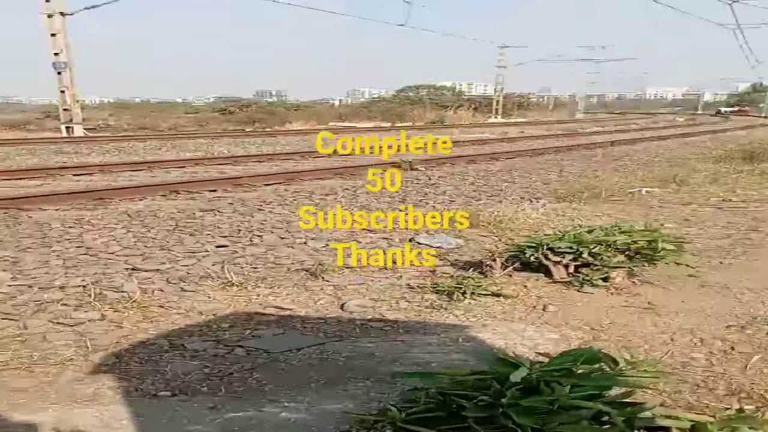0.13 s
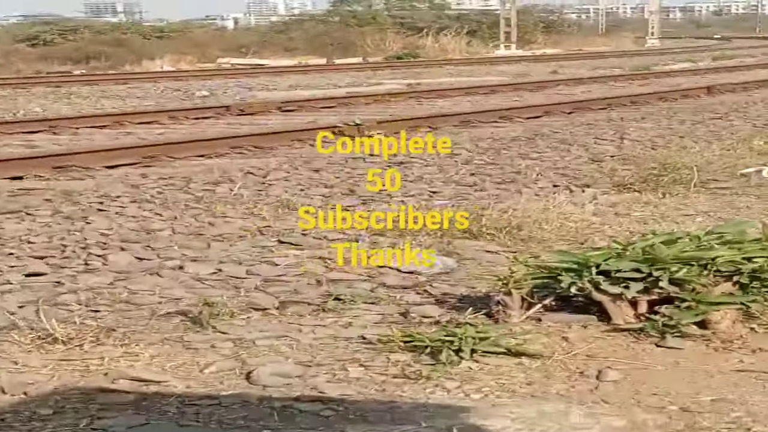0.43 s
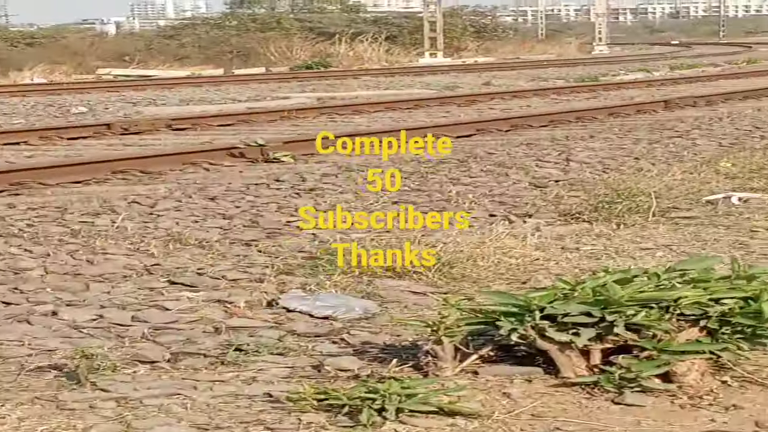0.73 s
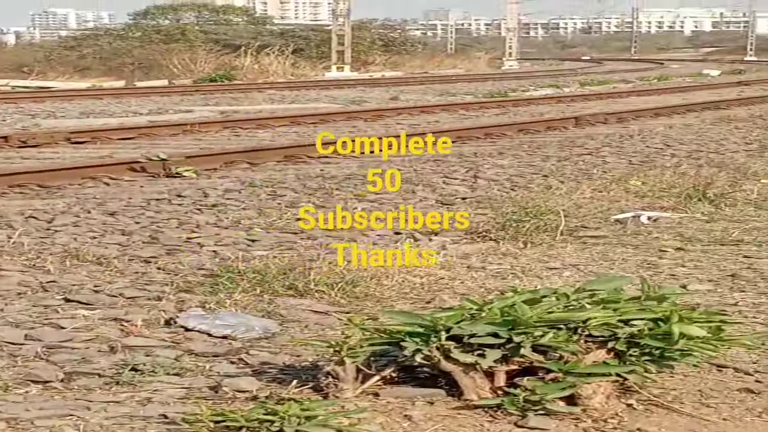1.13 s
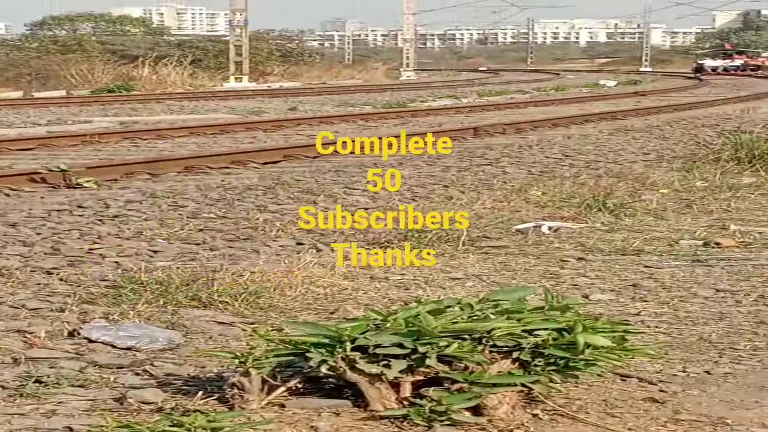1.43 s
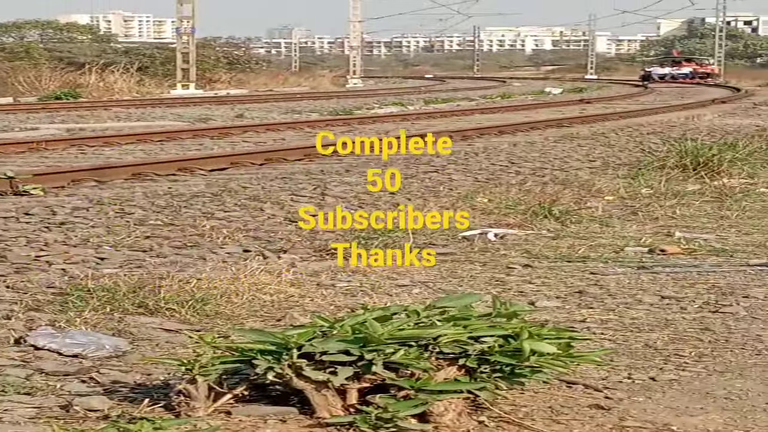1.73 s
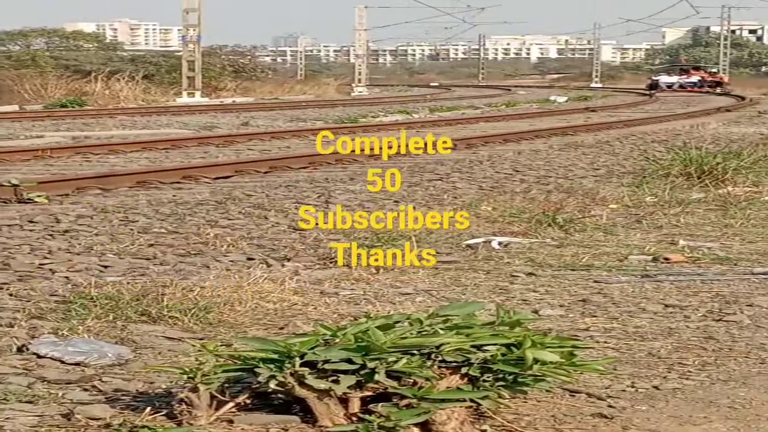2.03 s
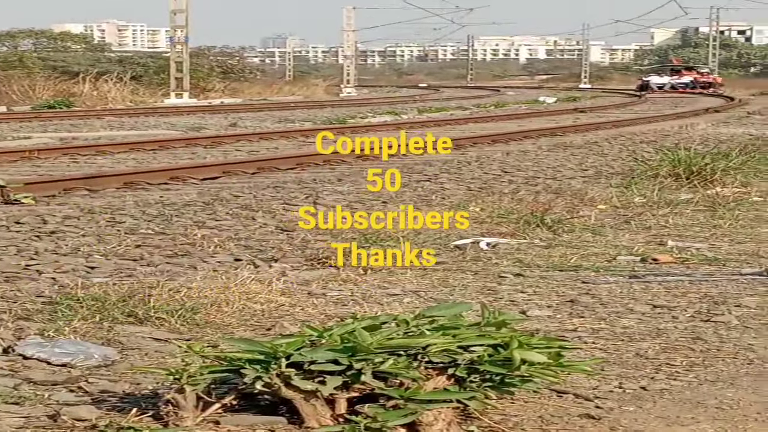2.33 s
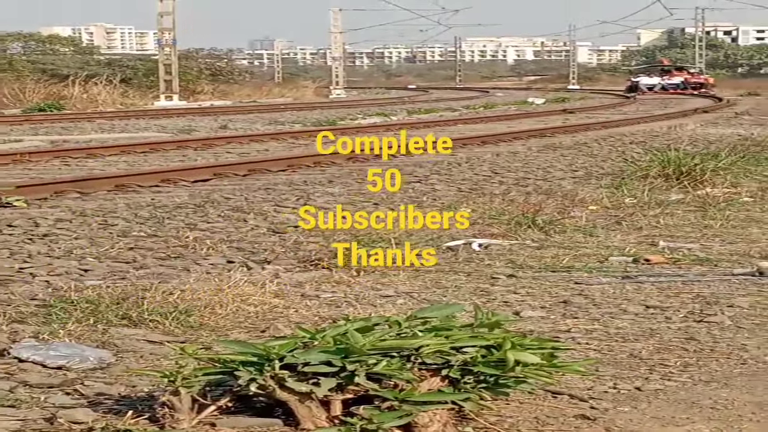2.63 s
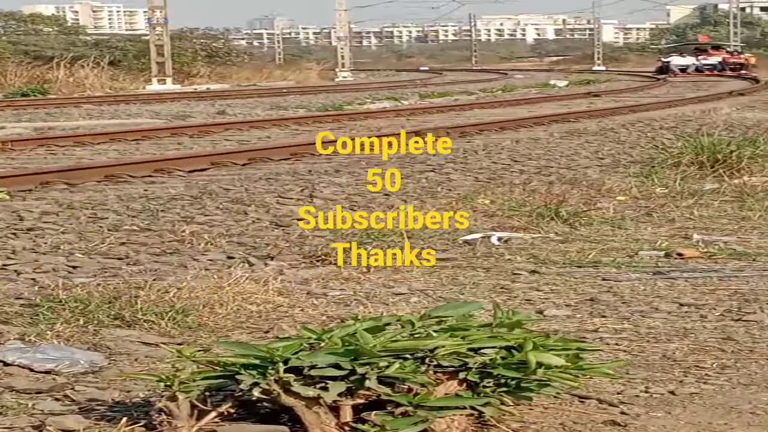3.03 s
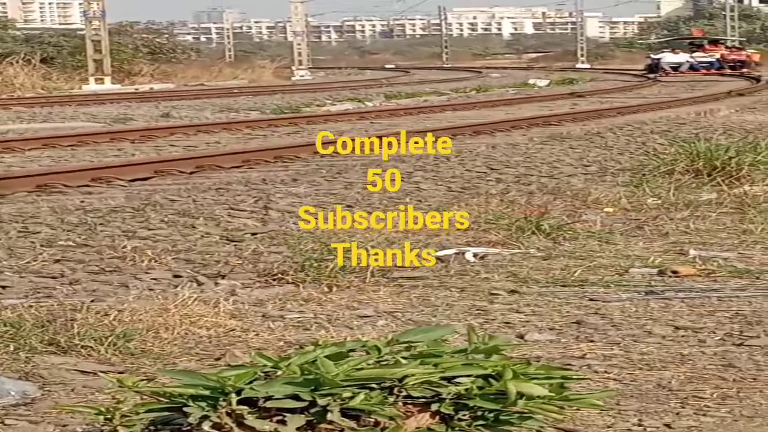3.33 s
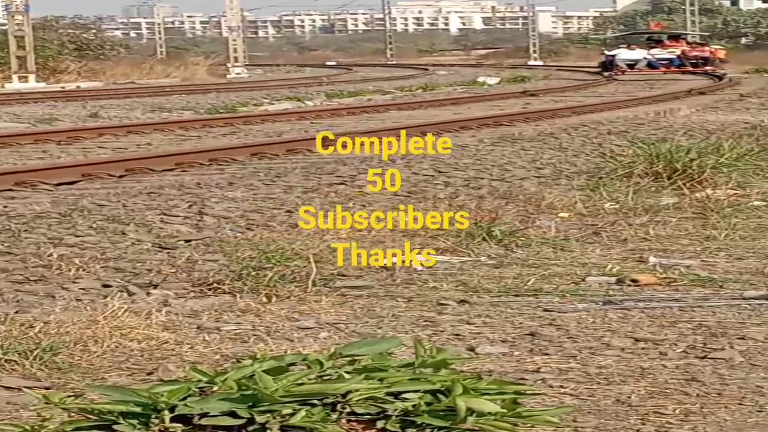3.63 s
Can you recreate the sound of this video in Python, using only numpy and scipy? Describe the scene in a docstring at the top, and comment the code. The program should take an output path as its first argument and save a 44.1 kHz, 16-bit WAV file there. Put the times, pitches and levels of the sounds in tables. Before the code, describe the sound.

A small motor trolley on rails approaches across an open yard, its engine knocking about ten times a second over clatter and hiss; wind thumps the phone microphone midway, and the rolling roar grows.

```python
"""A small motor trolley on rails nears across an open yard: from the start its single-cylinder engine knocks
about ten times a second, each contact ringing the casing, over clatter and hiss (shaped noise) and a low hum (sines).
Wind thumps on the ports of a phone (damped low rings) come now and then throughout, strongest near 1.6 to 2.1 s;
between about 0.95 and 1.35 s there are faint gliding squeaks and two dry ticks (shaped clicks). The rolling roar
(noise and wandering drones) swells later. The phone has a narrow dip near 520 Hz and a step down above 1400 Hz."""
import sys
import numpy as np
from scipy import signal
from scipy.fft import rfft, irfft
from scipy.io import wavfile

SR = 44100
rng = np.random.default_rng(int(sys.argv[2]) if len(sys.argv) > 2 else 0)


def digitize_waveform(pressure):
    """Quantize a signal to 16-bit integers and store it at the path in sys.argv[1].

    Rows of a 2-D input are taken as channels; values are limited to [-1, 1].
    """
    field = np.atleast_2d(pressure).T
    bounded = np.clip(field, -1, 1)
    quanta = np.round(bounded * 32767).astype(np.int16)
    wavfile.write(sys.argv[1], SR, quanta)


def volts_from_db(level):
    """Convert decibel levels to linear amplitude ratios."""
    exponent = np.asarray(level, float) / 20
    return 10 ** exponent


N = 166257
TIME_S = np.arange(N) / SR
SIZE = 2 ** 18   # transform length, samples
HZ = np.maximum(np.arange(SIZE // 2 + 1) * SR / SIZE, 1)
TREBLE_BOOST_DB = 24   # offsets the phone's step down for sources above it
SHARED_ONLY = np.array([[1], [0]])   # row 0 reaches both ports alike, row 1 does not


def rms_one(x):
    """Normalisation: scale to unit rms."""
    return x / np.sqrt(np.mean(x ** 2) + 1e-20)


def in_time(rows):
    """Linear interpolation: table columns as curves over time."""
    s, *columns = np.transpose(rows)
    return [np.interp(TIME_S, s, column) for column in columns]


def on_hz(rows):
    """Interpolation on a logarithmic frequency axis; a lone column falls to -90 dB outside its range."""
    hz, *columns = np.transpose(rows)
    outside = [-90, -90] if len(columns) == 1 else []
    return [np.interp(np.log(HZ), np.log(hz), column, *outside) for column in columns]


def colour(x, spectrum):
    """Minimum-phase filtering: folding the cepstrum forward makes the given response causal."""
    cepstrum = irfft(on_hz(spectrum)[0] * np.log(10) / 20)
    cepstrum[1:SIZE // 2] *= 2
    cepstrum[SIZE // 2 + 1:] = 0
    response = np.exp(rfft(cepstrum))
    return irfft(rfft(x, SIZE) * response)[..., :N]


def drift(rate_hz):
    """Low-pass random process: noise through two equal poles, of unit rms."""
    stride = 40   # samples between computed points
    settle = 2000
    r = np.exp(-2 * np.pi * rate_hz * stride / SR)
    white = rng.standard_normal(N // stride + settle + 2)
    slow = signal.lfilter([1], [1, -2 * r, r * r], white)[settle:]
    return np.interp(np.arange(N) / stride, np.arange(len(slow)), rms_one(slow))


def ring(clicks, hz, t60_s):
    """Damped resonator: a unit click excites an exponentially decaying sine of initial height 1."""
    r = volts_from_db(-60 / (t60_s * SR))
    w = 2 * np.pi * hz / SR
    return signal.lfilter([0, np.sin(w)], [1, -2 * r * np.cos(w), r * r], clicks + 1e-18)


def clicks_at(s, gain):
    """Impulse excitation: one-sample clicks at the given times."""
    out = np.zeros(N)
    inside = (s >= 0) & (s < (N - 1) / SR)
    np.add.at(out, (s[inside] * SR).astype(int), gain[inside])
    return out


def coloured_pair(spectrum):
    """Spectral shaping: two uncorrelated coloured noises, scaled to unit rms."""
    return rms_one(colour(rng.standard_normal((2, N)), spectrum))


def noise(spectrum, level, flicker_db, rate_hz):
    """Amplitude modulation: coloured noises under one flickering level curve."""
    return coloured_pair(spectrum) * volts_from_db(in_time(level)[0] + flicker_db * drift(rate_hz))


def resonances(rows, level):
    """Narrow-band resonance: noise keeps each mode ringing, swelling and fading on its own."""
    out = 0
    for hz, width_hz, db in rows:
        t60_s = np.log(1000) / (np.pi * width_hz)
        mode = ring(rng.standard_normal((2, N)), hz, t60_s)
        flicker_db = 2.2 * drift(5.0)
        out = out + rms_one(mode) * volts_from_db(db + flicker_db)
    return out * volts_from_db(in_time(level)[0])


# strength of the firings: t/s, relative level/dB
FIRING_STRENGTH = [(0, -25), (.15, -29.5), (.34, -36.5), (.445, -32), (.545, -48), (.645, -27), (.745, -32),
                   (.845, -32.5), (.945, -27.5), (1.04, -27), (1.24, -33.5), (1.54, -31.5), (1.64, -35),
                   (1.84, -26.5), (2.14, -28.5), (2.33, -29.5), (2.54, -26), (2.7, -31), (3.1, -30),
                   (3.43, -30), (3.53, -28.5), (3.77, -26.5)]
# contacts in one engine cycle: share of the cycle after firing, relative level/dB
CYCLE_CONTACTS = [(0, 2), (.047, 2.5), (.255, -5.5), (.53, -6), (.70, -5.5)]
# modes of the engine casing: f/Hz, relative level/dB, t60/s
CASING_MODES = [(652, -13, 0.068), (740, -14, 0.037), (913, -2.5, 0.025), (1092, -8, 0.039),
                (1190, -2.5, 0.04), (1359, -6.5, 0.025)]
# spectrum of the puff: f/Hz, relative level/dB
PUFF_SPECTRUM = [(1300, -35), (2000, 7.5), (2600, 2.5), (3300, 4), (4300, -6), (6000, -9), (7300, -9),
                 (10000, -13), (14000, -29)]
CYCLE_HZ, FIRST_FIRING_S = 10.04, .0435
CYCLE_JITTER_S, CONTACT_JITTER_S = .0005, .00012
STRENGTH_SPREAD_DB, MODE_SPREAD_DB = .8, 1.5
LOW_MODE_LAG_S = 0.00903   # modes under 800 Hz speak later
PUFF_DB, PUFF_DELAY_S, PUFF_T60_S = -8, 0.006, 0.044


def engine():
    """Impulsive modal excitation: every contact rings the casing and lets out a decaying bright puff."""
    share, contact_db = np.transpose(CYCLE_CONTACTS)
    cycle = np.arange(-1, 38)[:, None]
    jitter_s = CYCLE_JITTER_S * rng.standard_normal((39, 1))
    s = (FIRST_FIRING_S + (cycle + share) / CYCLE_HZ + jitter_s).ravel()
    s = s + CONTACT_JITTER_S * rng.standard_normal(len(s))
    db = np.interp(s, *np.transpose(FIRING_STRENGTH)) + np.tile(contact_db, 39)
    db = db + STRENGTH_SPREAD_DB * rng.standard_normal(len(s))

    casing = 0
    for k, (hz, mode_db, t60_s) in enumerate(CASING_MODES):
        hit_db = db + mode_db + MODE_SPREAD_DB * rng.standard_normal(len(s))
        hits = clicks_at(s + LOW_MODE_LAG_S * (hz < 800), volts_from_db(hit_db))
        casing = casing + ring(hits, hz, t60_s) * (-1) ** k   # neighbouring modes alternate in sign
    high_pass = signal.butter(2, 600, "high", fs=SR, output="sos")
    casing = signal.sosfilt(high_pass, casing)

    puff_clicks = clicks_at(s + PUFF_DELAY_S, volts_from_db(db + PUFF_DB))
    puff_envelope = signal.lfilter([1], [1, -volts_from_db(-60 / (PUFF_T60_S * SR))], puff_clicks)
    return casing * SHARED_ONLY + puff_envelope * coloured_pair(PUFF_SPECTRUM)


# steady engine clatter: t/s, relative level/dB
CLATTER_CURVE = [(0, -43.5), (.9, -42), (1.7, -41), (2.4, -43), (3.1, -39), (3.77, -38.5)]
# its spectrum: f/Hz, relative level/dB
CLATTER_SPECTRUM = [(500, -52), (560, -10), (745, -6), (775, -10), (1000, -7.5), (1200, -6.5),
                    (1320, -15.5), (1500, -6), (1800, -31)]


def clatter():
    """Broadband noise: dense engine clatter as flickering mid-range noise."""
    return noise(CLATTER_SPECTRUM, CLATTER_CURVE, flicker_db=2.5, rate_hz=26.0)


# resonances of the frame: f/Hz, bandwidth/Hz, level re the clatter curve/dB
FRAME_MODES = [(574.8, 19, -10), (636, 23, -10), (737, 49, -14), (920, 13, -11), (959.5, 16, -13),
               (1085, 8.4, -10), (1184, 17, -12.5), (1281, 7.6, -20.5), (1350.4, 20, -15)]


def frame():
    """Sustained resonance: the frame is kept ringing by noise that follows the clatter level."""
    return resonances(FRAME_MODES, CLATTER_CURVE)


# rolling roar as it nears: t/s, relative level/dB
ROAR_CURVE = [(0, -44.5), (.65, -45.5), (1.1, -43), (1.7, -39), (2.2, -36), (2.8, -33.5), (3.3, -34.5),
              (3.55, -30), (3.63, -35), (3.77, -31)]
# its spectrum: f/Hz, relative level/dB
ROAR_SPECTRUM = [(200, -41), (300, -25), (350, -16.5), (400, -10), (440, -9.5), (495, -5.5), (575, -9),
                 (640, -11), (700, -18), (745, -13), (770, -28), (900, -25.5)]


def roar():
    """Band-limited noise: the rolling roar swells along its level curve."""
    return noise(ROAR_SPECTRUM, ROAR_CURVE, flicker_db=0.02, rate_hz=10.0)


# wandering drones inside the roar: mean f/Hz, rms wander/Hz, relative level/dB
DRONE_TONES = [(462, 8.1, -42), (485, 9.024, -43)]
DRONE_RATE_HZ, DRONE_FLICKER_DB = 18.0, 1.8
THROB_DEPTH, THROB_PEAK_S = .16, .049   # two throbs an engine cycle
ROAR_SHARE = 0.77   # dB of drone swell per dB of roar swell


def drones():
    """Random frequency modulation: tones of quickly wandering pitch throb and swell with the roar."""
    tones = 0
    for hz, wander_hz, db in DRONE_TONES:
        height = volts_from_db(db + DRONE_FLICKER_DB * drift(DRONE_RATE_HZ))
        phase = 2 * np.pi * np.cumsum(hz + wander_hz * drift(DRONE_RATE_HZ)) / SR
        tones = tones + height * np.sin(phase)
    throb = 1 + THROB_DEPTH * np.cos(2 * np.pi * 2 * CYCLE_HZ * (TIME_S - THROB_PEAK_S))
    roar_db, = in_time(ROAR_CURVE)
    swell = volts_from_db(ROAR_SHARE * (roar_db - roar_db.mean()))
    return np.sqrt(2) * swell * tones * throb * SHARED_ONLY


# spectrum of the rumble: f/Hz, relative level/dB
RUMBLE_SPECTRUM = [(15, -44), (25, -18.5), (92, -0.5), (193, -6.5), (285, -8), (340, -12), (440, -33),
                   (750, -120)]
# its course: t/s, relative level/dB
RUMBLE_CURVE = [(0.0, -50), (0.94, -53), (3.77, -50.5)]


def rumble():
    """Low-frequency noise: a rumble with flickering level."""
    return noise(RUMBLE_SPECTRUM, RUMBLE_CURVE, flicker_db=2.0, rate_hz=24.0)


# course of the hiss: t/s, relative level/dB
HISS_CURVE = [(0, -66), (1.2, -65), (2.4, -64), (3.77, -61)]
# its spectrum: f/Hz, relative level/dB
HISS_SPECTRUM = [(3500, -28), (4600, -7), (6200, -8), (7200, -0.5), (8500, -9.5), (9800, -4.5),
                 (11500, -12.5), (13000, -18), (15000, -22)]


def hiss():
    """High-frequency noise: a hiss with slightly flickering level."""
    return volts_from_db(TREBLE_BOOST_DB) * noise(HISS_SPECTRUM, HISS_CURVE, flicker_db=0.87, rate_hz=12.0)


# upper rattle of the trolley: t/s, relative level/dB
RATTLE_CURVE = [(0, -63), (1.2, -62.5), (2.4, -60.5), (3.77, -58.5)]
# its spectrum: f/Hz, relative level/dB
RATTLE_SPECTRUM = [(1000, -8), (1750, -4.5), (2000, 0), (2500, 0), (2800, -8.5), (3300, -4.5),
                   (3800, -10.5), (4250, -8), (5500, -37)]


def rattle():
    """Band-limited noise: the upper rattle of the trolley."""
    return volts_from_db(TREBLE_BOOST_DB) * noise(RATTLE_SPECTRUM, RATTLE_CURVE, flicker_db=1.16, rate_hz=20.0)


# loose parts that ring in patches: f/Hz, bandwidth/Hz, level re their curve/dB
LOOSE_MODES = [(1665, 85, -12.5), (1953, 19, -15.5), (3050, 50, -18), (3580, 72, -17.5), (4264, 16, -19)]
# their course: t/s, relative level/dB
LOOSE_CURVE = [(0, -66.5), (3.77, -54.5)]


def loose_parts():
    """Narrow-band resonance: loose parts ring, swelling and fading independently."""
    return volts_from_db(TREBLE_BOOST_DB) * resonances(LOOSE_MODES, LOOSE_CURVE)


# hum partials: t/s, then rms level/dB of the 3rd, 4th and 5th multiple, before the phone response
HUM_PARTIALS = [(0, -63, -62, -62), (1, -67, -63.5, -57), (1.6, -59, -58, -56), (2.2, -60.5, -60, -64),
                (3.1, -54, -58, -54), (3.45, -86, -51, -54), (3.77, -52, -52, -56)]
HUM_HZ = 24.45


def hum():
    """Harmonic series: three multiples of one slightly wavering rotation."""
    rotation = 2 * np.pi * np.cumsum(HUM_HZ * (1 + 0.0038 * drift(6.1))) / SR
    out = 0
    for multiple, db in enumerate(in_time(HUM_PARTIALS), start=3):
        out = out + np.sqrt(2) * volts_from_db(db) * np.sin(multiple * rotation + rng.uniform(0, 7.53))
    return out


# wind thumps on the ports: t/s, relative level/dB, f/Hz, t60/s
WIND_THUMPS = [(0.263, -40, 100, 0.1), (0.681, -49, 75, 0.16), (1.647, -32, 106, 0.14),
               (1.701, -39, 62, 0.16), (1.943, -30.5, 98, 0.14), (2.047, -30, 128, 0.078),
               (2.061, -38.5, 65, 0.16), (3.0, -48, 70, 0.082), (3.551, -41, 89, 0.14),
               (3.709, -43, 85, 0.11)]


def thumps():
    """Damped oscillation: low-passed pressure pushes, mostly on the right port."""
    out = 0
    for s, db, hz, t60_s in WIND_THUMPS:
        out = out + ring(clicks_at(np.array([s]), volts_from_db(np.array([db + 9]))), hz, t60_s)
    r = np.exp(-2 * np.pi * 180 / SR)   # two poles at 180 Hz soften the onset
    out = signal.lfilter([(1 - r) ** 2], [1, -2 * r, r * r], out)
    left_db, right_db = -18.5, 0
    return out * volts_from_db(np.array([[left_db], [right_db]]))


# faint high squeaks: start t/s, length/s, from f/Hz, to f/Hz, relative level/dB
SQUEAK_GLIDES = [(0.954, .05, 11500, 11350, -73), (1.09, 0.045, 10700, 11700, -68),
                 (1.30, .045, 13300, 12800, -70)]


def squeaks():
    """Linear frequency glide: short tones under half-sine envelopes."""
    out = 0
    for s, length_s, from_hz, to_hz, db in SQUEAK_GLIDES:
        progress = np.clip((TIME_S - s) / length_s, 0, 1)
        phase = 2 * np.pi * np.cumsum(from_hz + (to_hz - from_hz) * progress) / SR
        out = out + volts_from_db(db + TREBLE_BOOST_DB) * np.sin(np.pi * progress) * np.sin(phase)
    return out


# two dry ticks close by: t/s, relative level/dB
TICK_TIMES = [(1.000, -43.5), (1.008, -47)]
# spectrum of a tick: f/Hz, relative level/dB
TICK_SPECTRUM = [(2500, -18), (4000, 3), (5500, -7), (8000, 3), (15000, -18)]


def ticks():
    """Impulse response: each click sounds the short bright response of a filter."""
    s, db = np.transpose(TICK_TIMES)
    return colour(clicks_at(s, volts_from_db(db)), TICK_SPECTRUM) * volts_from_db(TREBLE_BOOST_DB + 14.0)


# sound at the two ports: f/Hz, likeness 0-1, left-right level difference/dB, phase lead of the left/rad
PORT_PATHS = [(40, 0.5, -3, 0), (152, 0.88, -0.5, 0.26), (350, 0.89, -1, -0.06), (474, 0.97, -3.5, -0.02),
              (650, 0.92, -2.5, -0.9), (758, 0.18, -7.5, 1), (840, 1, -5.5, 0.7), (935, 0.79, 3, 0.98),
              (1110, 0.96, 2, -0.12), (1290, 0.58, 4.5, 0.73), (1940, 0.27, -8, 1), (2430, 0.35, 2, 3),
              (4420, 0.02, -0.5, 3), (10460, 0.01, -2, 2)]


def ports(pair):
    """Interaural-style coherence: shared and unshared parts are mixed over two ports by frequency."""
    alike, db, lead = on_hz(PORT_PATHS)
    shared, unshared = rfft(pair, SIZE)
    sign = np.array([[1], [-1]])   # left, right
    mix = np.sqrt(1 + alike) * shared + sign * np.sqrt(1 - alike) * unshared
    difference = volts_from_db(sign * db / 2) * np.exp(.5j * sign * lead)
    return irfft(mix * difference)[:, :N]


def scene():
    """Superposition: far sources pass through the port paths and the others are added directly."""
    far = engine() + clatter() + frame() + roar() + drones()
    far = far + rumble() + hiss() + rattle() + loose_parts()
    return ports(far * volts_from_db(-3.0)) + hum() + thumps() + squeaks() + ticks()


# response of the phone: f/Hz, gain level/dB
PHONE_RESPONSE = [(15, -31), (30, -13), (45, -1), (497, -0.5), (507, -20.5), (524, -24.5), (545, -6.5),
                  (570, -0.5), (1365, -2), (1410, -22), (20000, -24.5)]


def phone(dry):
    """Linear filtering: the phone has a narrow dip near 520 Hz and a step down above 1400 Hz."""
    return colour(dry, PHONE_RESPONSE)


def low_pass(x):
    """Removes everything above the highest recorded frequency."""
    return signal.sosfilt(signal.butter(12, 15130, fs=SR, output="sos"), x)


def record(dry):
    """Signal chain: the scene as the phone takes it down."""
    mix = phone(dry)
    return low_pass(mix)


dry = scene()
out = record(dry)
digitize_waveform(out)
```